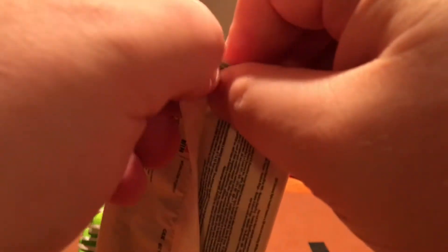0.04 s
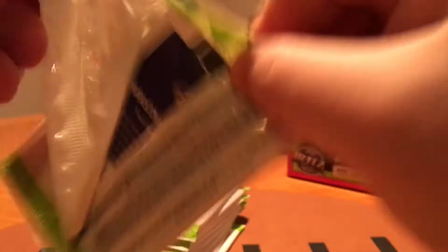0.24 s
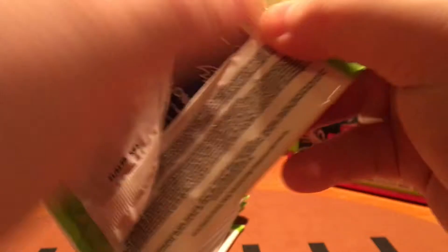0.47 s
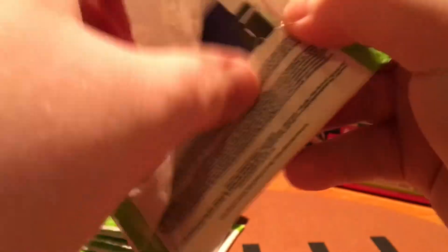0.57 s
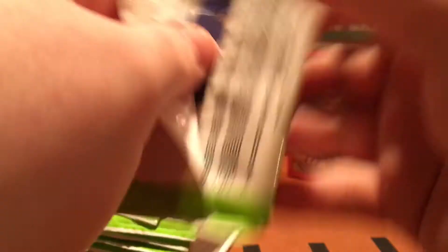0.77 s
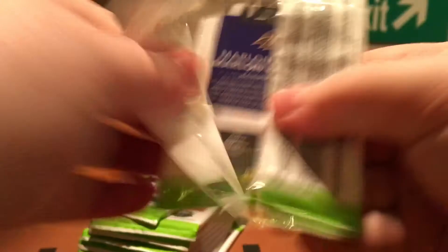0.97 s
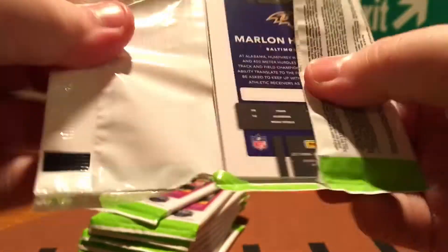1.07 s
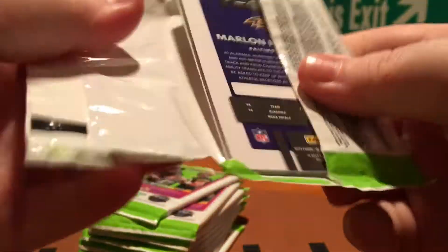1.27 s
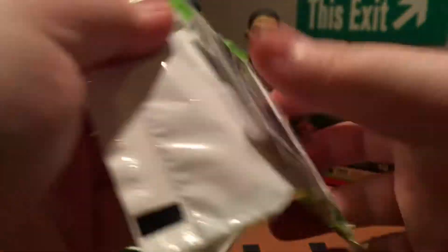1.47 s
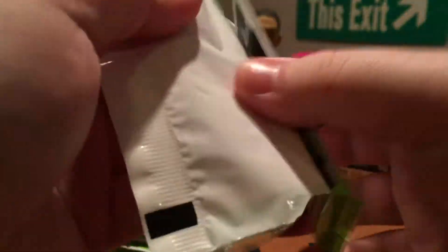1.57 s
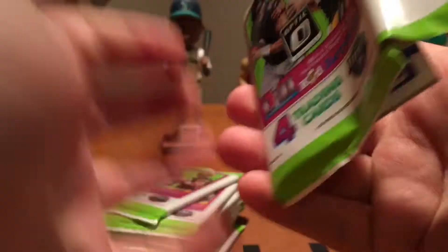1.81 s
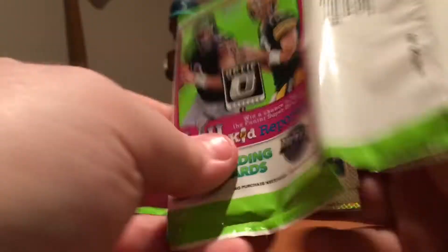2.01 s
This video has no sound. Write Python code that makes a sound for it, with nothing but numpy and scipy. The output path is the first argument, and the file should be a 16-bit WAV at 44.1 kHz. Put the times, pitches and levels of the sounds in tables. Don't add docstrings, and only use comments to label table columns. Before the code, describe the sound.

Crisp foil wrapper ripping and crinkling in two hands, dense snaps, very close, indoors

```python
import sys
import numpy as np
from scipy import signal
from scipy.fft import rfft, irfft
from scipy.io import wavfile
from scipy.ndimage import uniform_filter1d

SR = 44100
rng = np.random.default_rng(int(sys.argv[2]) if len(sys.argv) > 2 else 0)


def nominal_scale(level):
    x = np.asarray(level, float) / 20
    return 10 ** x


def digitize_waveform(pressure):
    field = np.atleast_2d(pressure).T
    bounded = np.clip(field, -1, 1)
    quanta = np.round(bounded * 32767).astype(np.int16)
    wavfile.write(sys.argv[1], SR, quanta)


N = 90404


def curve(table, at, col=1):
    return np.interp(at, [row[0] for row in table], [row[col] for row in table])


def colour(table, hz):
    log_hz = np.log([row[0] for row in table])
    return nominal_scale(np.interp(np.log(hz + 1), log_hz, [row[1] for row in table]))


def hiss(table):
    spectrum = rfft(rng.standard_normal(N)) * colour(table, np.fft.rfftfreq(N, 1 / SR))
    noise = irfft(spectrum, N)
    return noise / noise.std()


# pitch_hz, level_db
ROOM_TONE = [(60, 16.5), (215, 8.5), (600, 2), (4000, -3), (16000, -8)]


def room_tone():
    return nominal_scale(-51) * hiss(ROOM_TONE)


# pitch_hz, level_db
FOIL = [(150, 4.5), (800, 0), (1600, -4.5), (3500, -4.5), (5000, -8), (6400, -3.5), (10500, -4),
        (15000, 1.5)]
GRAIN = 1024
RISE_S, FADE_S = 0.0003, 0.00089


def snaps(at, db, hz, body_db):
    t = np.arange(GRAIN) / SR
    f = np.fft.rfftfreq(GRAIN, 1 / SR) + 1
    chance = rng.standard_normal((len(at), GRAIN + 20))

    fade_s = FADE_S * np.exp(0.25 * chance[:, -1:])
    front = (1 - np.exp(-(t / RISE_S) ** 2)) * np.exp(-t / fade_s)
    burst = rfft(chance[:, :GRAIN] * front)

    pitch = hz[:, None]
    patch_q, patch_db, kick = 5.5, 4.5, 2.67
    patch = nominal_scale(patch_db) / (1 + 1j * patch_q * (f / pitch - pitch / f))
    click = kick * patch * np.exp(-2j * np.pi * f * RISE_S)

    body = nominal_scale(body_db[:, None] / (1 + (f / 5500) ** 4))
    body = body / np.sqrt(1 + (0.48 * np.minimum(pitch, 4000) / f) ** 6)
    lump_hz = np.linspace(0, SR / 2, 18)
    lumps = nominal_scale(2 * np.array([np.interp(f, lump_hz, row) for row in chance[:, GRAIN:GRAIN + 18]]))

    cepstrum = irfft(np.log(body * lumps * colour(FOIL, f)))
    fold = np.r_[1, np.full(GRAIN // 2 - 1, 2), np.zeros(GRAIN // 2)]
    foil = np.exp(rfft(cepstrum * fold))

    rows = irfft((burst * (1 + patch) + click) * foil, GRAIN)
    loudest = uniform_filter1d(rows[:, :200] ** 2, size=44).max(axis=1)
    rows *= (nominal_scale(db) / np.sqrt(loudest * 2))[:, None]
    out = np.zeros(N + GRAIN)
    np.add.at(out, (at * SR).astype(int)[:, None] + np.arange(GRAIN), rows)
    return out[:N]


def swarm(t0, t1, per_s, spread_db):
    chance = rng.random((int((t1 - t0) * per_s), 3))
    at = t0 + (t1 - t0) * chance[:, 0]
    db = -spread_db * (np.log(1 - chance[:, 1]) + 1)
    hz = 800 * 7.46 ** chance[:, 2]
    return at, db, hz


# start_s, level_db
RUSTLE = [(0, -38.5), (.13, -77), (.21, -37), (.33, -64), (.44, -37), (.49, -32), (.6, -46.5), (.76, -28.5),
          (.86, -69), (.98, -26), (1.13, -55), (1.2, -53), (1.36, -39), (1.41, -40), (1.5, -45.5),
          (1.7, -30.5), (1.79, -65), (1.9, -69)]


def rustle():
    t = np.arange(N) / SR
    at, db, hz = swarm(0, N / SR, per_s=650, spread_db=4)
    crackle = snaps(at, np.minimum(db, 7) + curve(RUSTLE, at), hz, 0 * at - 1.5)

    stroke_at_s, stroke_width_s, stroke_db = 1.955, 0.091, -35
    stroke = nominal_scale(stroke_db) * np.exp(-((t - stroke_at_s) / stroke_width_s) ** 2)
    slide = nominal_scale(curve(RUSTLE, t) - 7) + stroke
    skin = hiss(FOIL) + nominal_scale(-7) * hiss(AIR)
    return crackle + slide * skin


# start_s, level_db, pitch_hz, body_over_treble_db
CREASES = [(0.0533, -7, 3790.0, -3.5), (0.2242, -4, 3880, 9), (0.2275, 0.5, 3500, 18.5),
           (0.2326, 4.5, 8600, -2), (0.241, -17, 6630.0, -7), (0.2488, 5, 8800, 6),
           (0.2605, -15, 9600, -23), (0.2614, 1, 3640, 9), (0.2654, 1, 3620.0, -3),
           (0.275, -8, 5500, -3), (0.283, -4, 1420.0, 7), (0.2928, 11, 2800, 6), (0.3004, -16, 3500, 16),
           (0.308, -12, 3010.0, 1), (0.31, -9, 2760.0, 0), (0.3125, -23, 3190.0, -2),
           (0.3164, -4.5, 3480, 1), (0.3173, -2.5, 3560, 11), (0.324, -21, 1980.0, -3),
           (0.3432, -15, 2890.0, -9), (0.3465, -12, 1780, 4), (0.3545, -7.5, 3620.0, -2),
           (0.3592, -6.5, 5400, 3), (0.3722, -4.5, 1440, 6.5), (0.375, -7, 3600, 2),
           (0.3782, -9, 9090.0, -2), (0.402, -18.5, 6460.0, 8), (0.42, -23, 3320.0, 11),
           (0.427, -25.5, 2020, 13), (0.4605, -5.5, 4300, 0), (0.4651, -4, 2560, 0),
           (0.4757, -27, 3490.0, 14), (0.4815, -15.5, 2560, 9), (0.4894, -18, 3360.0, -9),
           (0.492, -27, 1770.0, -11), (0.5, -13, 4220.0, -9), (0.5143, -19.5, 5560, 12),
           (0.5296, -22, 2540.0, -5), (0.5353, -14, 9100, -10), (0.5485, -6.5, 6960, 6),
           (0.5803, -4, 3400, 0.5), (0.5989, -14, 6330.0, 0), (0.6038, -11, 3540, 4),
           (0.6237, -12, 3230, -0.5),
           (0.6364, -18.5, 3240, -5), (0.6673, -27, 6460.0, -7), (0.6949, -14, 2920, 1),
              (0.699, -19, 8400, -4), (0.7138, -8.5, 4280, 4), (0.7279, -7, 2520, 6),
              (0.7354, -16, 6550.0, -7), (0.7427, -10, 3830.0, 13), (0.7474, -17.5, 2700, -4),
              (0.749, -11, 9100, -5), (0.7518, -4.5, 9600, 8), (0.7657, -20, 2280.0, -5),
              (0.7799, -8.5, 2350, 2.5), (0.7844, -9.5, 8100, 7), (0.7853, -7.5, 4020, -3),
              (0.7925, -14, 2280.0, -6), (0.8086, -8.5, 8700, 9.5), (0.8213, -26, 3490.0, 2),
              (0.8775, 1, 7530, 6), (0.8872, -21, 8500, -16), (0.9014, -6.5, 2900, -2),
              (0.9111, -11.5, 5400, 5), (0.9251, -14, 8400, 11.5), (0.9576, -21, 3010.0, 8),
              (0.9619, -14.5, 3500, 1), (0.9827, -11, 5380.0, 3), (0.988, -4, 7700, 3),
              (0.9978, -24, 7060.0, -9), (1.0062, 0, 5240, 0), (1.0074, -15, 9470.0, -5),
              (1.013, -9, 1920, -6), (1.0178, 1, 2870, -6), (1.0194, -5, 1260, 4), (1.0204, 4, 6330, 4),
              (1.028, -1, 6600, 8), (1.0335, -6, 6200.0, -18), (1.0447, 6, 6200, -1), (1.054, 4, 3600, 4),
              (1.0627, -1, 1950, -3), (1.0676, 10, 5500, 11), (1.0793, -3, 2760.0, -7),
              (1.0864, 0, 2820, -7), (1.0903, 5, 6240, 4), (1.0943, -0.5, 1560, 7),
           (1.106, -6, 3700, 8), (1.1078, -7, 870, 3), (1.1193, -7.5, 6360, 5), (1.1332, -3.5, 5850, 6),
              (1.1931, -20, 3270, 5.5), (1.2146, -24, 1310, 3), (1.2328, -16, 2610, 9.5),
              (1.2454, -10, 2300, 10.5), (1.2639, -22, 2490, 4), (1.2723, -16, 2240.0, 6),
              (1.3743, -21, 2650, 10), (1.3785, -0.5, 2530, 2.5), (1.3851, 4, 2380, -2),
              (1.3951, 2, 2410, -8), (1.3985, 0.5, 2450, -8), (1.4021, -12, 2570, 15),
              (1.4239, -14.5, 3170, 29), (1.4272, -18, 9450, 8), (1.4309, -16, 4050.0, 17),
              (1.5269, -1, 2120, -3), (1.5673, -32, 5600.0, -25), (1.58, -8.5, 3480, 12),
              (1.5814, -4.5, 4200, 8.5), (1.612, -18, 3400.0, 11), (1.6173, -10, 2230, 7),
              (1.6299, -18, 8500, -6), (1.6375, -6.5, 4070, 5.5), (1.6646, -13, 8570.0, 9.5),
              (1.683, -10, 3140.0, -7), (1.6841, -4.5, 8180.0, -2), (1.6878, -4.5, 2270, 1),
              (1.7217, 0.5, 4760, -2), (1.7256, -11, 3490.0, -4), (1.7313, -10.5, 3480, 22),
              (1.7354, -2, 5900, 5), (1.7541, -5, 4230, 3), (1.7591, 2.5, 3230, -2.5),
              (1.7647, -20, 3040, -6), (1.8308, -22, 1590.0, 16), (1.8357, -15, 1500, 11),
              (1.8378, -26, 1030.0, -1), (1.843, -17, 1200, 9), (1.8571, -28, 735, 7),
              (1.9685, -14, 3200, -0.5),
           (0.2015, -27.5, 3560, 1),
    (0.4592, -23, 2600, 14),
    (1.607, -32, 4270, 9),
    (1.8025, -27.5, 3200, 21),
    (2.0254, -22.5, 2010, 7),
]


def creases():
    every = np.array(CREASES, float)
    at, db, hz, body_db = every.T
    return snaps(at - RISE_S, db + 1.36, hz, body_db)


# start_s, level_db, decay_s
PUFFS = [(0.223, -5, 0.004), (0.261, -30.5, 0.026), (0.297, -26.5, 0.021), (.46, -30.5, 0.021),
         (0.491, -30, 0.019), (0.602, -32, 0.02), (0.783, -33.5, 0.019), (0.955, -32.5, 0.026),
         (1.011, -29, 0.035), (1.089, -11, 0.0093), (1.244, -29.5, 0.016), (1.389, -25, 0.015),
         (1.579, -35.5, 0.028), (1.689, -18.5, 0.0029), (1.739, -29, 0.025), (1.828, -24, 0.0083),
         (1.856, -31.5, 0.0095), (1.962, -43, 0.024)]
# pitch_hz, level_db
AIR = [(30, -6), (60, -0.5), (200, 1.5), (700, -13.5)]


def puffs():
    rise_s, swing_hz, sag_s = 0.0054, 262.3, 0.01033
    air = hiss(AIR)
    out = 0
    for at, db, decay_s in PUFFS:
        t = np.maximum(np.arange(N) / SR - at, 0)
        push = nominal_scale(db) * (1 - np.exp(-t / rise_s)) * np.exp(-t / decay_s)
        swing = np.sin(2 * np.pi * swing_hz * sag_s * np.log(1 + t / sag_s))
        out = out + push * (swing + 2.62 * air)
    return out


# start_s, effort_db, body_over_treble_db
TEARS = [
    [(.2235, -13.5, 1.5), (.245, -13, -6), (.252, -10, -7), (.295, -7.5, 0), (.304, -12, 8), (.322, -36, 0)],
    [(1.028, -6, -2.5), (1.045, -10.5, -0.5), (1.072, -17.5, 3.5), (1.078, -23, 12.5), (1.097, -17, 10),
     (1.114, -33, 13)],
    [(.778, -22.5, 4), (.793, -41.5, 9.5)],
    [(1.479, -36, -0.5), (1.495, -24, -12)],
    [(.486, -21, 0), (.503, -38, 10)],
]


def tears():
    out = 0
    for tear in TEARS:
        start_s, end_s = tear[0][0], tear[-1][0]
        span_s = 0.12 if len(tear) > 2 else 0.03
        at, db, hz = swarm(start_s, start_s + span_s, per_s=2000, spread_db=2.5)
        body_db = curve(tear, at, col=2)
        effort_db = curve(tear, at) + 4 - 99 * (at > end_s)
        out = out + snaps(at, db + effort_db, hz * nominal_scale(1 - 0.5 * body_db), body_db)
    return out


# start_s, level_db
KNOCKS = [
    (.2245, -15),
    (.728, -18.5),
    (1.0995, -7.5),
    (1.528, -15.5),
    (1.7225, -19),
]


def knocks():
    ring_hz, decay_s = 728, 0.0022
    start_s, level_db = np.array(KNOCKS)[:, :1], np.array(KNOCKS)[:, 1:]
    t = np.maximum(np.arange(N) / SR - start_s, 0)
    rings = nominal_scale(level_db) * np.exp(-t / decay_s) * np.sin(2 * np.pi * ring_hz * t)
    return rings.sum(axis=0)


def echo(x, decay_s, db):
    t = np.arange(SR // 3) / SR
    dull = signal.lfilter(*signal.butter(1, 6000, fs=SR), rng.standard_normal(len(t)))
    tail = dull * np.exp(-t / decay_s)
    return nominal_scale(db) * signal.fftconvolve(x, tail / np.sqrt(np.sum(tail ** 2)))[:N]


def scene():
    foil = rustle() + creases() + tears() + knocks()
    near = echo(foil, decay_s=0.012, db=-17)
    room_t60_s = 0.41
    room = echo(foil, decay_s=room_t60_s / np.log(1000), db=-27)
    return (foil + near + room + puffs() + room_tone())[None]


def low_pass(x):
    return signal.sosfilt(signal.butter(12, 16450, fs=SR, output="sos"), x)


def record(dry):
    x = signal.sosfilt(signal.butter(2, 45, "high", fs=SR, output="sos"), dry)
    x = signal.sosfilt(signal.cheby2(16, 32, 16050, fs=SR, output="sos"), x)
    clipped = np.clip(x, -0.97, 0.97)
    return low_pass(clipped)


dry = scene()
out = record(dry)
digitize_waveform(out)
```